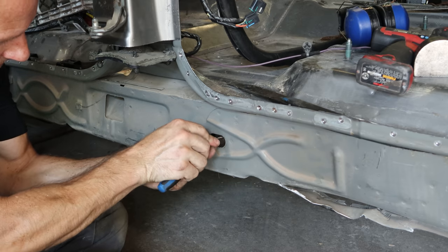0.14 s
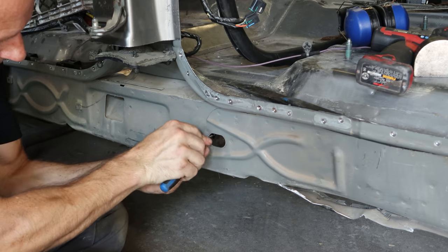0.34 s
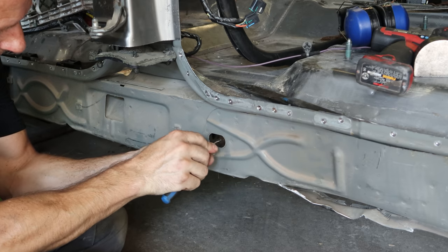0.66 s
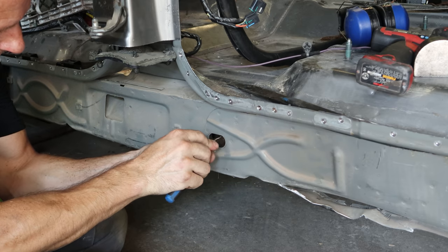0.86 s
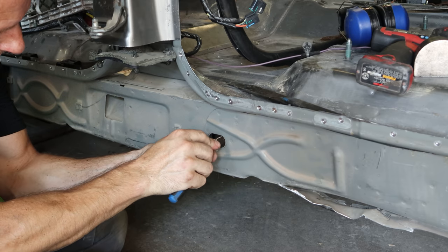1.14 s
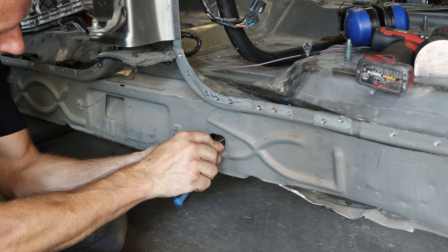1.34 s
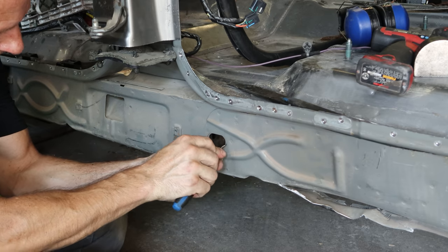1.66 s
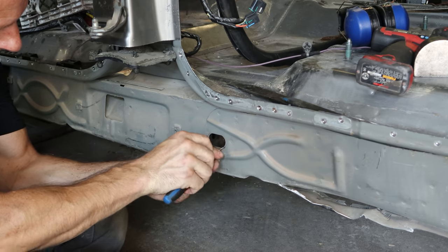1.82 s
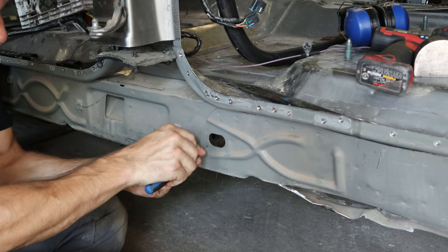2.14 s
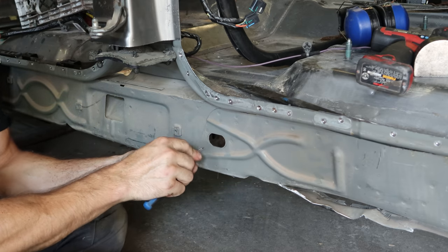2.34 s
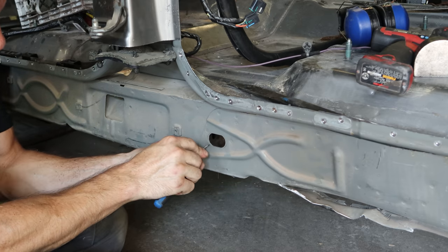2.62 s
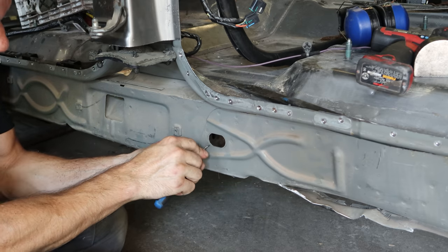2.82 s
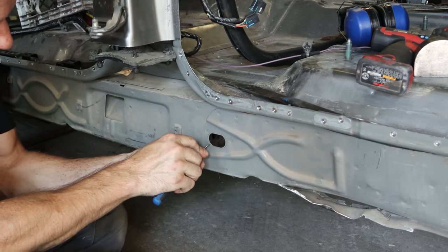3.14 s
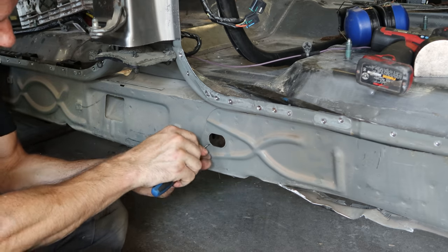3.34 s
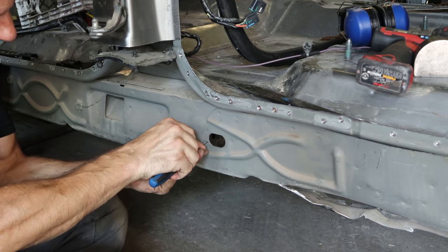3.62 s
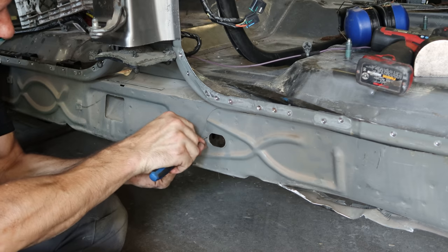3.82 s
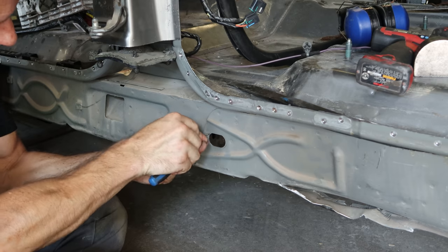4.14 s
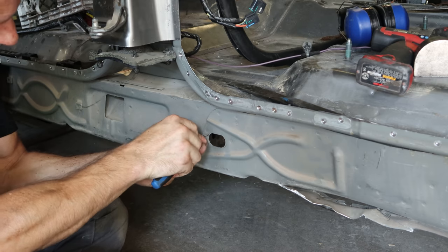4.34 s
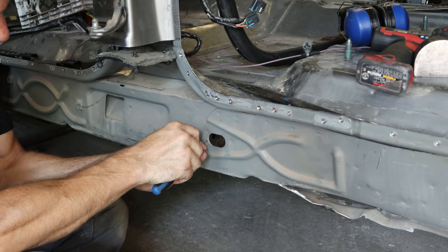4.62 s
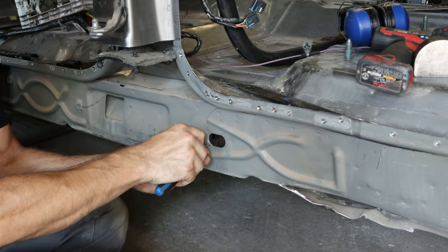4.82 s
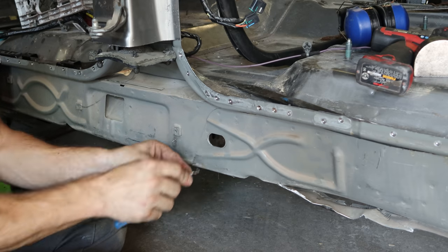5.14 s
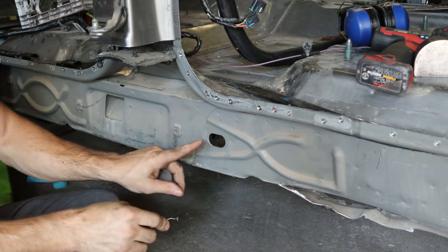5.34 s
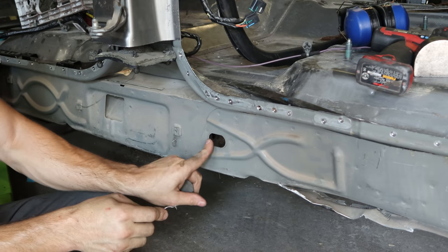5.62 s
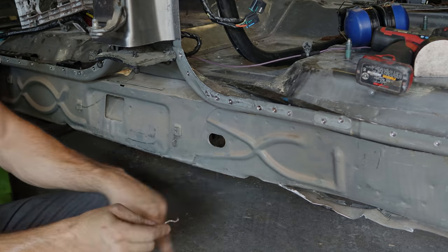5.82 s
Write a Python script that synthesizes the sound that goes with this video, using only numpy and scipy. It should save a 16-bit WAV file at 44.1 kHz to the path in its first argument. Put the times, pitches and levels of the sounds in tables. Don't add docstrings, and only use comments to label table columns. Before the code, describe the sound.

Close mono pickup of steel scratching sheet steel, with soft microphone hiss and a roomy workshop tail. Three separated groups of stick-slip scrapes grow from light to loud, each slip a short grainy spray with a thin tinny ring and hollow panel body. Faint low booms follow hard jolts. A last short scrape snaps off the edge, then one bright knock with a dull thump and faint touches.

```python
import sys
import numpy as np
from scipy import signal
from scipy.fft import rfft, irfft
from scipy.io import wavfile

SR = 44100
rng = np.random.default_rng(int(sys.argv[2]) if len(sys.argv) > 2 else 0)


def linear_from_db(decibels):
    return 10 ** (np.asarray(decibels, float) / 20)


def log_audio(samples):
    frames = np.atleast_2d(samples).T
    limited = np.clip(frames, -1, 1)
    pcm = np.round(limited * 32767).astype(np.int16)
    wavfile.write(sys.argv[1], SR, pcm)


N = 263667


def unit(x):
    return x / np.sqrt(np.sum(x ** 2) + 1e-20)


def read(points, hz):
    f, value = np.transpose(points)
    return np.interp(np.log(hz + 1), np.log(f + 1), value)


def dying_noise(t60, size, colour=1):
    t, hz = np.arange(size) / SR, np.fft.rfftfreq(size, 1 / SR)
    spectrum = rfft(rng.standard_normal(size)) * colour
    centres = np.geomspace(80, 16000, num=10)
    total = np.zeros(size)
    for centre, only_this in zip(centres, np.eye(len(centres))):
        share = np.interp(np.log(hz + 1), np.log(centres), only_this)
        total += irfft(spectrum * share, size) * linear_from_db(-60 * t / read(t60, centre))
    return unit(total)


def ring(modes, size):
    t = np.arange(size) / SR
    hz, db, t60 = np.transpose(modes)[:, :, None]
    waves = np.sin(2 * np.pi * (hz * t + rng.random(hz.shape)))
    decay = linear_from_db(db - 60 * t / t60) / np.sqrt(t60)
    return unit((decay * waves).sum(0))


def hiss(level_db=-50.5):
    # frequency in Hz, density in dB per Hz.
    colour = [(12, 13), (20, -14), (81, -10.5), (113, -1), (145, -12), (176, -4.5), (283, -11),
              (537, -10.5), (671, -9), (815, -8.5), (1420, -10.5), (2160, -11.5), (4110, -14), (7380, -6.5),
              (15700, -15.5)]
    spectrum = rfft(rng.standard_normal(N)) * linear_from_db(read(colour, np.fft.rfftfreq(N, 1 / SR)))
    return linear_from_db(level_db) * np.sqrt(N) * unit(irfft(spectrum, N))


def shop(x, gap_s=.012):
    # frequency in Hz, t60 in seconds.
    room_t60 = [(150, 0.96), (600, 0.74), (1500, 0.84), (4000, 0.53), (10000, 0.59)]
    tail = np.concatenate([np.zeros(round(gap_s * SR)), dying_noise(room_t60, 32768)])
    return signal.fftconvolve(x, tail)[:N]


def chatter(start, length, first_db, last_db, tool_db, count=16):
    uneven, spread_db = .35, 0.5
    jitter, spread = rng.uniform(-1, 1, (count, 2)).T
    gap_s = np.interp((first_db + last_db) / 2, [-36, -24], [.027, .011])
    index = np.arange(count)
    along = (index + uneven * jitter * (index > 0)) * gap_s / length
    db = first_db + (last_db - first_db) * along + spread_db * spread
    db = db - 999 * (along > 1)
    return [(start + u * length, level, tool_db) for u, level in zip(along, db)]


def slips(touch_tool_db=-18):
    # start in seconds, force in dB, tool share in dB.
    catches = [(0.0014, -25.5, -20), (0.136, -31.5, -25), (0.3236, -34, -14), (0.388, -20.5, 0.5),
               (0.4004, -22.5, -6.5), (0.438, -27.5, -14), (1.713, -27.5, -7.5), (1.7456, -27, -14),
               (1.899, -33.5, -8), (2.0742, -28, -10), (2.0962, -16.5, -9), (2.148, -20, -29),
               (2.2639, -30.5, -9), (3.594, -25, -13), (3.6658, -10.5, -20.5), (3.6973, -15.5, -12),
               (3.7936, -13, -12), (3.844, -18, -12), (3.9335, -12.5, -19.5), (4.0143, -12.5, -16.5),
               (4.04, -13.5, -14.5), (4.0685, -17.5, -13), (4.107, -13, -9), (4.5844, -28, -22),
               (4.7364, -23, -24.5), (4.777, -28.5, -18), (4.8753, -26, -20), (4.9448, -19, -15.5),
               (4.9832, -14, -13), (4.9917, -13.5, -1.5)]
    # start in seconds, length in seconds,
    # force at the start in dB, force at the end in dB, tool share in dB.
    drags = [(0.013, 0.028, -35, -33, -28), (0.161, 0.13, -36, -41.5, -19), (0.34, 0.049, -31.5, -25, -5.5),
             (0.39, 0.041, -22.5, -29.5, -22), (1.372, 0.14, -44, -45, -9), (1.645, .05, -39, -36, -11),
             (1.724, 0.1, -34.5, -38.5, -12.5), (1.873, .18, -39, -31, -11),
             (2.106, 0.037, -19.5, -17.5, -13.5), (2.175, .045, -34.5, -31, -17),
             (3.568, .02, -36, -42, -28), (3.705, 0.014, -19, -30.5, -26), (3.804, .065, -9.5, -17, -20.5),
             (3.946, 0.057, -16.5, -14.5, -20.5), (4.026, .12, -13, -15.5, -21),
             (4.538, 0.095, -36, -33, -11), (4.755, 0.017, -38, -35, -11), (4.888, 0.023, -50, -47, -9),
             (4.937, 0.032, -27, -37.5, -18), (5.002, 0.026, -16, -24, -14)]
    # start in seconds, force in dB, box share in dB, drum share in dB.
    touches = [(2.8249, -43, -9, -14), (2.9955, -48, 3, -22), (3.233, -52, -4, 12),
               (4.4298, -33.5, -9, 0.5), (4.8434, -32.5, -7, 0), (5.4194, -41.5, -7, -15),
               (5.5304, -42.5, -3, -21), (5.6192, -46.5, -7, -14), (5.783, -37.5, -19, -14),
               (5.8587, -46, -8, 0)]
    # time in seconds, box share in dB, drum share in dB,
    # contact pitch in Hz, how much that pitch stands out in dB.
    place = [(0, -16, 2, 1520, -7), (.2, -12.5, 1, 1470, -6), (.34, -4.5, 7, 1980, 13),
             (.42, -14, 3.5, 2650, -1.5), (1.4, -8.5, 1, 1520, -4), (1.72, -9, -7.5, 1450, -9),
             (1.93, -5, 6.5, 1510, 4.5), (2.08, -6.5, 0.5, 1450, 0), (2.14, -15.5, 7, 1570, 4.5),
             (2.27, -15, 4, 1620, 0), (3.58, -19, 6, 1460, 2.5), (3.67, -25, -7, 1760, 1),
             (4.13, -30.5, -8, 2230, 0.5), (4.55, -11, 3, 3170, 5), (4.88, -11.5, -4.5, 2150, 2.5),
             (4.94, -15, -14, 1630, 12.5), (5.0, -12.5, -6, 1620, 2), (6, 1, -14, 1800, -1)]
    at_s, box, drum, hz, lift = np.transpose(place)
    scratches = list(catches)
    for drag in drags:
        scratches += chatter(*drag)
    rows = [(s, db, np.interp(s, at_s, box), np.interp(s, at_s, drum), tool_db)
            for s, db, tool_db in scratches]
    rows += [(*touch, touch_tool_db) for touch in touches]
    return [(*row, np.interp(row[0], at_s, hz), np.interp(row[0], at_s, lift)) for row in rows]


def grit(dice, db, hard_s=0.0095, soft_s=0.014, grains_per_s=5000, spread_db=2.0, first=3.84):
    t = np.arange(len(dice)) / SR
    hard = np.clip((db + 36.5) / 14, 0, 1)
    struck = dice[:, 0] < grains_per_s / SR
    size = linear_from_db(-spread_db * np.log(dice[:, 1] + 0.013)) * np.sign(dice[:, 2] - .5)
    spray = struck * size * np.exp(-t / (soft_s + hard * (hard_s - soft_s)))
    spray[0] += first * hard
    return unit(spray)


def contact(spray, hz, lift_db):
    b, a = signal.iirpeak(hz, 3.5, fs=SR)
    return spray + linear_from_db(lift_db) * signal.lfilter(b, a, spray)


def crowd(lo_hz, hi_hz, size):
    # frequency in Hz, density in dB per Hz.
    density = [(71, -87), (120, -27.5), (407, -9.5), (519, -16.5), (690, -0.5), (829, -8), (955, -6.5),
               (1430, -7), (1590, -11.5), (1720, -7.5), (2240, -17.5), (5490, -31), (15500, -36)]
    # frequency in Hz, t60 in seconds.
    decay = [(150, 0.28), (500, 0.24), (1000, 0.13), (2000, 0.043), (4000, 0.077), (8000, 0.037),
             (15000, 0.0039)]
    hz = np.fft.rfftfreq(size, 1 / SR)
    edges = 1 / np.sqrt((1 + (lo_hz / (hz + 1)) ** 8) * (1 + (hz / hi_hz) ** 8))
    return dying_noise(decay, size, linear_from_db(read(density, hz)) * edges)


def part(modes, lo_hz, hi_hz, crowd_db, rise_s, size=12288):
    rise = 1 - np.exp(-np.arange(size) / SR / rise_s)
    both = (ring(modes, size) + linear_from_db(crowd_db) * crowd(lo_hz, hi_hz, size)) * rise
    return both / np.abs(both).max()


def steel_parts():
    # frequency in Hz, level in dB, t60 in seconds.
    box = [(199, -7.5, 0.043), (237.7, -3.5, 0.064), (291.5, -5.5, 0.46), (361.2, -4, 0.5),
           (407.7, -2, 0.14), (455.5, -10, 0.31)]
    drum = [(578, -22, 0.12), (636.5, -0.5, 0.085), (678, 2, 0.18), (749, -7, 0.3), (763, -24, 0.11)]
    panel = [(935.4, 2.5, 0.18), (990, 2.5, 0.052), (1042, 0.5, 0.16), (1087, 1, 0.14), (1131, -2, 0.28),
             (1269, -1, 0.29), (1417.5, 3.5, 0.042), (1461, -1, 0.077), (1694, -14, 0.092),
             (1920, -7, 0.12), (2478, -6.5, 0.14), (2630, -11.5, 0.067), (2792, -11.5, 0.05),
             (3230, -31, 0.23)]
    tool = [(3700, -7, .025), (4100, -8, .02), (5375, 0, .035), (5600, -6, .018), (6070, -3, .02),
            (6470, -8, .02), (7400, -11, .012), (8300, -9, .015), (9400, -12, .012), (9970, -11, .015)]
    tip = [(12600, -1, .0025), (13900, 0, .003), (15000, -4, .0025)]
    return [part(box, 169, 493, crowd_db=4.0, rise_s=0.002),
            part(drum, 536, 660, crowd_db=-1.0, rise_s=0.00049),
            part(panel, 787, 4000, crowd_db=0.5, rise_s=0.00013),
            part(tool, 2860, 12300, crowd_db=7.0, rise_s=0.000073),
            part(tool, 3700, 8100, crowd_db=-2.5, rise_s=0.0013),
            part(tip, 7900, 17000, crowd_db=-1.5, rise_s=0.00019)]


def slip_drive(count, lead_s=.001):
    # time in seconds, how freely the tool sings in the fingers in dB,
    # how sharply its tip bites in dB.
    grip = [(0, -7, -9), (.33, 0, -6), (.375, -6, -4), (.385, -24, -13), (2.0, -8, -14), (3.6, -24, -27),
            (3.79, -10, 2), (3.9, 3, -10.5), (3.94, -13, -1), (4.02, 2, -6), (4.14, 2.5, 3), (4.5, -15, -1),
            (4.97, -15, -10), (6, -5, -2)]
    at_s, free, bite = np.transpose(grip)
    drive = np.zeros((count, 6, N + 2048))
    for k, (s, db, box_db, drum_db, tool_db, hz, lift_db) in enumerate(slips()):
        at = max(round((s - lead_s) * SR), 0)
        spray = grit(rng.random((2048, 3)), db)
        pitched = contact(spray, hz, lift_db)
        sprays = np.array([spray, spray, pitched, pitched, spray, spray])
        sing_db = tool_db + np.interp(s, at_s, free)
        bite_db = tool_db + np.interp(s, at_s, bite)
        shares_db = np.array([box_db, drum_db, 0, tool_db, sing_db, bite_db])
        drive[k % count, :, at:at + 2048] += linear_from_db(db + shares_db)[:, None] * sprays
    return drive


def scribe(shop_db=-9, count=3):
    levels = linear_from_db([[2.5], [-5], [-3.5], [4.5], [7], [1.5]])
    to_walls = linear_from_db(shop_db + np.array([1.5, -4.0, -2.56, -3.5, -5.5, -38]))
    out = np.zeros(N)
    for place in slip_drive(count):
        steel = levels * signal.oaconvolve(place, steel_parts(), axes=1)[:, :N]
        out += steel.sum(0) + shop(to_walls @ steel)
    return signal.sosfilt(signal.butter(4, 110, "high", fs=SR, output="sos"), out)


def strike(s, db, modes, rise_s):
    size = SR // 2
    sound = ring(modes, size) * (1 - np.exp(-np.arange(size) / SR / rise_s))
    return np.pad(linear_from_db(db) * sound / np.abs(sound).max(), (round(s * SR), N))[:N]


def shell():
    # start in seconds, peak in dB.
    jolts = [
        (0.398, -45),
        (2.102, -45),
        (4.03, -53),
        (4.999, -41),
    ]
    # frequency in Hz, level in dB, t60 in seconds.
    boom = [(53.3, -5, 0.54), (76.4, 1.5, 0.64), (102.6, 8.5, 0.8), (122.2, -4, 0.79), (128, -17, 0.74)]
    return sum(strike(s, db, boom, rise_s=0.0091) for s, db in jolts)


def free_edge():
    # start in seconds, level in dB.
    let_go = (4.993, -39.5)
    # frequency in Hz, level in dB, t60 in seconds.
    edge = [(1700, -6, 0.46), (1900, -1, 1), (2430, -9, 0.4), (2580, 2, 0.41), (2720, 0, 1)]
    return strike(*let_go, edge, rise_s=0.0026)


def handle_knock(shop_db=-10):
    # start in seconds, snap level in dB, thump level in dB.
    blow = (5.352, -21.5, -30.5)
    # frequency in Hz, level in dB, t60 in seconds.
    snap = [(930, 0, 0.027), (1390, -0.5, 0.011), (1930, -3, .012), (2580, 5, 0.0087), (3390, 2, 0.011),
            (3800, 5.5, 0.0082), (4320, -2, 0.011), (8340, -1.5, .006)]
    thump = [(228, -16, 0.056), (294, -4.5, 0.17), (370, -1.5, 0.11), (413, -2.5, 0.085),
             (602, -3.5, 0.031)]
    s, snap_db, thump_db = blow
    knock = strike(s, snap_db, snap, rise_s=0.00019) + strike(s, thump_db, thump, rise_s=0.0029)
    return knock + linear_from_db(shop_db) * shop(knock)


def scene():
    return (hiss() + scribe() + shell() + free_edge() + handle_knock())[None]


def low_pass(x):
    return signal.sosfilt(signal.butter(12, 15810, fs=SR, output="sos"), x)


def record(dry):
    b, a = signal.butter(2, 30, "high", fs=SR)
    mix = signal.lfilter(b, a, dry)
    return low_pass(mix)


dry = scene()
out = record(dry)
log_audio(out)
```